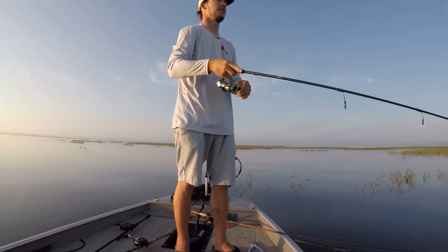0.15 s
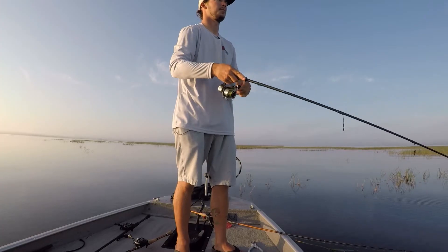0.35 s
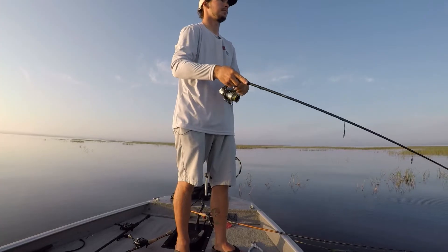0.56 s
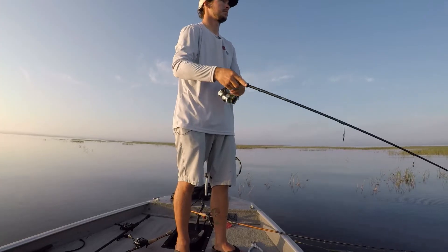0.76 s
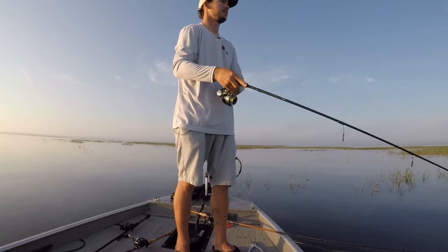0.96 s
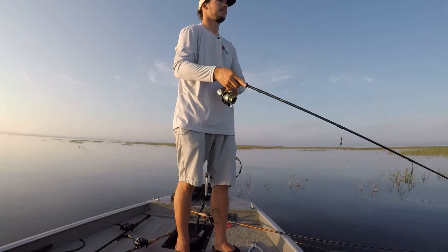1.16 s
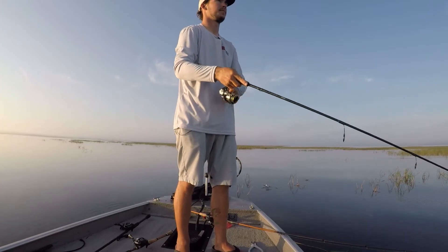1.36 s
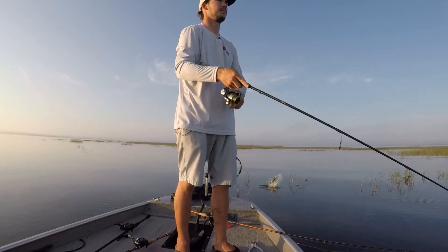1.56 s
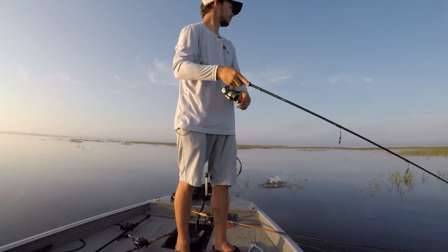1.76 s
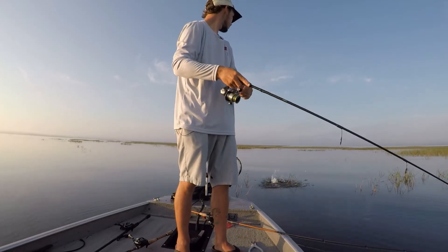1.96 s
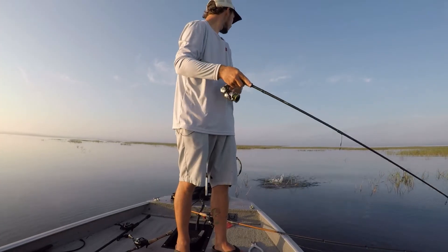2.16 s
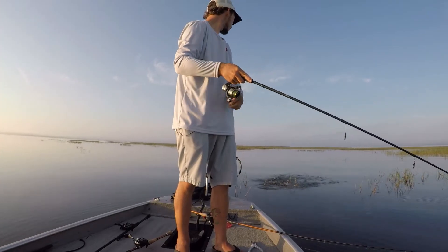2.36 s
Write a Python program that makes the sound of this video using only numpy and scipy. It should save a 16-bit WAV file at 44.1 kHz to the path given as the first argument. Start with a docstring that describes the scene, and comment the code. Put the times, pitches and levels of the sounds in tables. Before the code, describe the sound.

Splashes and bubbly plops on a calm lake, following ticking reel and rustling line above faint motor hum

```python
"""A low, steady hum comes first: the electric trolling motor of a small boat on a calm lake, two harmonics
wavering slightly, under light air that rumbles on the microphone as shaped noise.
An angler's reel and line tick and rustle: short rings of damped modes over crackling noise.
The lure lands and the water gulps, plops and patters: bubbles are damped tones of rising pitch,
and the spray that falls back is tiny pings, slaps and noise."""
import sys
import numpy as np
from scipy import signal
from scipy.fft import rfft, irfft, next_fast_len
from scipy.io import wavfile
from scipy.ndimage import map_coordinates

SR = 44100
rng = np.random.default_rng(int(sys.argv[2]) if len(sys.argv) > 2 else 0)


def master(y):
    """Save y as 16-bit WAV."""
    cut = np.clip(np.atleast_2d(y).T, -1, 1)
    pcm = np.round(cut * 32767)  # scale
    wavfile.write(sys.argv[1], SR, pcm.astype(np.int16))


N = 110250  # samples, 2.5 s

# Spectra are relative: each coloured sound is brought to rms 1 before its level is applied.

# Motor: the drift is a share of the pitch; the octave is second harmonic against first
HUM_HZ, HUM_DB, HUM_DRIFT, HUM_FLUTTER_DB = 135.7, -62.5, 0.0014, 0.5
HUM_OCTAVE_DB = -17.5

# Course of the air's rumble, before its offset and sway: time_s, level_db
AIR_COURSE = [(0, -59), (.15, -49), (.35, -50.5), (.5, -45.5), (.75, -52), (.85, -45.5), (1.15, -48.5),
              (1.44, -49.5), (1.52, -41), (1.65, -50), (1.8, -45), (1.97, -56), (2.22, -50), (2.5, -55)]
# Spectrum of the air's rumble: frequency_hz, density_db
AIR_SPECTRUM = [(8, -2.5), (22, 1.5), (32, -6), (50, -11), (80, -22.5), (125, -23.5), (200, -29.5),
                (300, -37.5), (600, -45), (2000, -94), (5000, -140)]
AIR_OFFSET_DB, AIR_SWAY_DB = 2.5, 1.12
# Spectrum of the lake's steady hush: frequency_hz, density_db
LAKE_SPECTRUM = [(60, -1.5), (200, -2), (320, -5), (600, -3.5), (1100, -7), (2300, -17.5), (4500, -16.5),
                 (7800, -22), (10500, -27.5), (15500, -49)]
LAKE_DB = -67.5

# Envelope of the electrical buzz's harmonics: frequency_hz, gain_db
BUZZ_SPECTRUM = [(2000, -54), (7000, 4), (10000, 8), (15500, 7)]
BUZZ_HZ, BUZZ_DB, BUZZ_ACCENT = 122.595, -83, .6  # accent: extra share on every eighth harmonic
TOP_HZ = 15900  # upper band limit of the whole scene

# Course of the running line's rustle, before its sway: time_s, level_db
LINE_COURSE = [(0, -71.5), (.1, -66.5), (.6, -65.5), (1.0, -64.5), (1.45, -64), (1.7, -65), (2.0, -67.5),
               (2.5, -67)]
# Spectrum of the rustle: frequency_hz, density_db
RUSTLE_SPECTRUM = [(500, -39), (1300, -5.5), (1750, -1), (2300, -1.5), (3100, -4.5), (3600, -5.5),
                   (4100, -9), (5000, -10), (6200, -16.5), (7700, -12), (10000, -18), (15000, -23.5)]
RUSTLE_SWAY_DB = 1
# The reel's main resonance, kept ringing by the line: half-width, level against the rustle, sway
WHIRR_HZ, WHIRR_WIDTH_HZ, WHIRR_DB, WHIRR_SWAY_DB = 2260, 200, -8.5, 1.5
# Ticks of the reel: start_s, level_db (before TICK_DB), brightness_db (at 7 kHz against 2.3 kHz),
# lean_db (where the contact falls, favouring one set of modes or the other)
TICKS = [(0.0366, -53.5, -1, 5), (0.068, -43.5, 3.5, 0), (0.0852, -43, 0, 5.5), (0.105, -47, 1, 4),
         (0.1082, -48, -18, 9), (0.1555, -46.5, 2, 4), (0.1692, -43.5, -12, -2), (0.255, -51, -2, 0),
         (.262, -46, -6, -12), (.337, -34.5, -7, -6.5), (0.353, -40, -7, -3), (.4695, -53, 3, -4),
         (0.4963, -42.5, -3, 1), (0.5213, -36, 2, -7), (0.528, -53, -24, 11), (0.54, -38.5, -0.5, 7),
         (0.553, -48, -10, -5), (0.555, -57, 9, -5), (0.571, -41.5, -8, -17), (.586, -40.5, 0.5, 5),
         (0.595, -48, 3.5, -1), (0.6123, -50, -15, 7), (.626, -55, -22, 6), (.7635, -53, 4.5, -2),
         (0.7894, -37.5, -6.5, -10), (0.8284, -51, 5, -3), (0.9301, -41, -2.5, -3.5), (0.9369, -41, 2, -1),
         (0.9754, -41, -1.5, 5), (1.0095, -40, -4.5, -17), (1.028, -46, -3, -9), (1.0345, -42.5, 4, 2.5),
         (1.1965, -46.5, 1.5, 10), (1.2294, -41.5, -5.5, -13), (1.2395, -56, 5, -3), (1.353, -49, -9, 5),
         (1.3773, -40.5, 1, 1), (1.4113, -44.5, -2.5, 7), (1.4491, -39.5, -15, -6), (1.4583, -36, -14, -2),
         (1.4597, -37, -20, -2), (1.4801, -41, 0, 5), (1.6798, -41.5, -5, -11)]
# Modes of the reel, before scatter: frequency_hz, level_db, t60_s, lean_share (no unit)
REEL_MODES = [(1744, -6, 0.012, 0.77), (2305, -0.5, 0.0085, -0.14), (2820, 0.5, 0.0054, 0.039),
              (4030, -3, 0.0063, 1), (5180, -6, 0.0064, -0.12), (5950, -6.5, 0.0052, -0.48),
              (7420, -3, 0.0043, 0.35), (8400, -2.5, 0.0022, 0.35), (11000, -13, .004, -0.39),
              (13000, -15, 0.006, 0.091)]
TICK_DB, TICK_RISE_S = -3, 0.000069
MODE_SCATTER_DB, MODE_SCATTER, MODE_LAG_S = 1.8, .025, .0006  # level, share of pitch, longest delay
REEL_LOW_HZ = 1360  # the small reel radiates no bass

# Soft bumps of the hull: centre_s, level_db, length_s
BUMPS = [(.01, -58, 0.078), (0.434, -53, 0.015), (.56, -73, .018), (0.658, -59, 0.029), (1.108, -60, 0.024),
         (1.307, -58.5, 0.023), (1.444, -51.5, 0.023), (1.766, -50, 0.06), (1.908, -53, 0.023),
         (2.003, -51.5, 0.014)]
# Spectrum of the bumps: frequency_hz, density_db
HULL_SPECTRUM = [(20, -30), (45, 1.5), (85, 1), (160, -15), (280, -16), (450, -23.5), (1200, -23),
                 (4000, -120)]
# Small waves lapping at the hull: centre_s, level_db, pitch_hz, length_s
LAPS = [(0.013, -64.5, 295, 0.034), (0.442, -73, 282, .02), (0.665, -66.5, 290, 0.033),
        (.78, -67.5, 240, 0.036), (.905, -64, 240, 0.03), (1.094, -61, 290, 0.013),
        (1.767, -62, 270, 0.046), (1.95, -61.5, 214, 0.021)]
LAP_WIDTH_OCT = 0.47

# Modes of the rod's handle: frequency_hz, level_db (against KNOCK_DB), t60_s
HANDLE_MODES = [(550, -8, 0.043), (900, -10.5, 0.018), (1170, 0, 0.014), (1760, 2, 0.016)]
KNOCK_S, KNOCK_DB = .3372, -51  # the hardest early click also knocks the handle

# Splashes: start_s, hold_s, release_t60_s, bubble_level_db, bubble_centre_pitch_hz, spray_level_db
SPLASHES = [(1.411, 0.07, 0.098, -57.5, 376, -63.5), (1.479, 0.016, 0.25, -56.5, 620, -81),
            (1.544, 0.079, 0.58, -63.5, 1034, -68), (1.711, 0.042, 0.59, -60.5, 993, -61.5),
            (1.846, 0.019, 0.3, -53, 1140, -61), (1.877, 0.032, 0.16, -53, 694, -60),
            (1.939, 0.097, 0.15, -64.5, 835, -62.5), (2.06, 0.094, 0.21, -60, 830, -65),
            (2.15, 0.11, 0.24, -71.5, 1010, -66), (2.268, 0.045, 0.42, -67, 1180, -66.5)]
# Single large bubbles: start_s, level_db, starting_pitch_hz, t60_s
PLOPS = [(1.438, -45.5, 287, 0.051), (1.488, -54, 414, 0.038), (1.513, -47.5, 519, 0.055),
         (1.52, -54, 1050, 0.047), (1.7742, -42, 1000, 0.021), (1.8603, -39, 844, 0.024),
         (1.869, -38.5, 630, 0.064), (1.881, -43, 956, 0.018), (1.886, -45, 441, 0.039),
         (1.898, -42, 558, 0.038), (1.948, -42.5, 523, 0.019), (1.989, -45, 655, 0.033),
         (2.0655, -36, 638, 0.025), (2.074, -47, 812, 0.042), (2.107, -46.5, 936, .04),
         (2.269, -47.5, 900, 0.05)]
SPLASH_RISE_S, PLOP_RISE_S = 0.006, 0.001
PLOP_GLIDE_PER_S = 3.9  # share of the starting pitch gained each second
BUBBLES_PER_S, CLOUD_S = 400, .3
BUBBLE_SPREAD, BUBBLE_CYCLES = 0.333, 24  # scatter of log pitch; periods in one t60
# Spectrum of the spray: frequency_hz, density_db
SPRAY_SPECTRUM = [(400, -18), (1200, 5.5), (2700, 1), (4200, 0.5), (5100, -7.5), (6200, 2), (7200, -9.5),
                  (8600, -1.5), (10500, -8), (12500, -7.5), (15500, -20)]
DROP_LOW_HZ, DROP_HIGH_HZ = 1200, 14000
DROP_T60_S, DROP_SPREAD_DB, MIST = .005, 20, .6  # t60 before scatter; mist against the drops

# Spectrum of the thin sheet of spray that opens the main splash: frequency_hz, density_db
SPURT_SPECTRUM = [(1000, -18), (3600, 5), (5500, -20), (7500, 12), (9000, 5), (10500, -1), (15500, -24)]
SPURT_S, SPURT_LENGTH_S, SPURT_DB = 1.738, 0.028, -66

# Single drops of spray hitting the water: start_s, level_db, starting_pitch_hz
DROPS = [(1.7257, -44, 7700), (1.727, -53, 2400), (1.7515, -45.5, 3230), (1.8096, -43, 3300),
         (1.853, -47, 3120), (1.8585, -51, 4370), (1.8635, -45, 1540), (1.8665, -47, 3670),
         (1.867, -42, 1700), (1.881, -40, 1510), (1.889, -51, 4500), (1.902, -58, 11600),
         (1.908, -45, 1800), (1.9615, -50, 12500), (1.9695, -52, 6260), (1.983, -53, 8800),
         (2.011, -53, 9150), (2.047, -48, 2980), (2.0725, -52, 3330), (2.1038, -45.5, 6200),
         (2.149, -47, 8850), (2.167, -53, 2590), (2.205, -45, 8400), (2.2378, -42.5, 2700),
         (2.241, -50, 9050), (2.271, -41, 2820), (2.294, -45, 5950), (2.318, -47, 3500)]
# t60 of the ping; level against it and t60 of the slap that opens it
DROP_RING_S, DROP_SLAP_DB, DROP_SLAP_S = .007, -5.5, 0.0023

# Course of the finest drops: time_s, level_db
SIZZLE_COURSE = [(1.8, -100), (1.9, -72), (2.1, -73.5), (2.32, -70.5), (2.4, -76.5)]
# Spectrum of the finest drops: frequency_hz, density_db
SIZZLE_SPECTRUM = [(2000, -44), (5400, -30), (6150, -8), (7000, -10), (15000, -40)]

DECK_DB, DECK_T60_S = -13.5, 0.041  # scatter from the boat's deck and hull


def amp(db):
    """Decibel law: level to amplitude gain."""
    return 10 ** (np.asarray(db) / 20)


def unit(x):
    """Normalisation: x at rms 1."""
    return x / np.sqrt(np.mean(x ** 2) + 1e-20)


def curve(rows):
    """Linear interpolation: one value per sample from (s, value) rows."""
    return np.interp(np.arange(N) / SR, *np.transpose(rows))


def wobble(rate):
    """Spline interpolation: a smooth random curve with rate knots a second."""
    return map_coordinates(rng.standard_normal(1024), [np.arange(N) * rate / SR], mode="wrap")


def filtered(x, response):
    """Linear filtering: the spectrum of x times a response of frequency."""
    m = next_fast_len(N + SR // 2)
    return irfft(rfft(x, m) * response(np.fft.rfftfreq(m, 1 / SR)), m)[:N]


def coloured(x, points):
    """Spectral shaping: x filtered through (Hz, dB) points on a log frequency axis, at rms 1."""
    f, db = np.transpose(points)
    return unit(filtered(x, lambda hz: amp(np.interp(np.log(hz + 1), np.log(f + 1), db))))


def add(track, s, sound):
    """Superposition: mixes a sound into a track at time s."""
    i = int(np.clip(round(s * SR), 0, N))
    track[i:i + len(sound)] += sound[:N - i]


def crackle(per_s, spread_db, smooth):
    """Random impulse process: tiny impacts of uneven size over a share of smooth noise."""
    sizes = rng.standard_normal(N) * amp(spread_db * rng.standard_normal(N))
    hits = (rng.random(N) < per_s / SR) * sizes
    return unit(hits) + smooth * rng.standard_normal(N)


def motor():
    """Harmonic tone: a nearly pure hum, its pitch and level wavering slightly with the propeller's load."""
    phase = 2 * np.pi * np.cumsum(HUM_HZ * (1 + HUM_DRIFT * wobble(5.77))) / SR
    tone = np.sin(phase) + amp(HUM_OCTAVE_DB) * np.sin(2 * phase)
    return amp(HUM_DB + HUM_FLUTTER_DB * wobble(8.3)) * unit(tone)


def air():
    """Broadband noise: a swaying low rumble of light wind on the microphone over the lake's hush."""
    level_db = curve(AIR_COURSE) + AIR_OFFSET_DB + AIR_SWAY_DB * wobble(12)
    rumble = amp(level_db) * coloured(rng.standard_normal(N), AIR_SPECTRUM)
    return rumble + amp(LAKE_DB) * coloured(rng.standard_normal(N), LAKE_SPECTRUM)


def buzz():
    """Fourier series: in-phase harmonics add up to faint, thin electrical pulses."""
    t, pulses = np.arange(N) / SR, np.zeros(N)
    for k in range(1, int(TOP_HZ / BUZZ_HZ) + 1):
        accent = 1 + BUZZ_ACCENT * (k % 8 == 0)
        pulses += accent * np.cos(2 * np.pi * k * BUZZ_HZ * t)
    return amp(BUZZ_DB) * coloured(pulses, BUZZ_SPECTRUM)


def tick(bright_db, lean_db):
    """Modal decay: one contact excites the reel's modes, each arriving a little late and dying away."""
    hz, db, t60, share = np.transpose(REEL_MODES)[:, :, None]
    size, detune, phase = rng.standard_normal((3, len(REEL_MODES), 1))
    lag = MODE_LAG_S * rng.random((len(REEL_MODES), 1))
    t = np.maximum(np.arange(SR // 40) / SR - lag, 0)
    tilt = np.log(hz / 2300) / np.log(7000 / 2300)  # 0 at 2.3 kHz, 1 at 7 kHz
    gain = amp(db + MODE_SCATTER_DB * size + bright_db * tilt + lean_db * share - 60 * t / t60)
    tones = np.sin(2 * np.pi * (hz * (1 + MODE_SCATTER * detune) * t + phase))
    ring = (gain * tones * (1 - np.exp(-t / TICK_RISE_S))).sum(0)
    return signal.sosfilt(signal.butter(2, REEL_LOW_HZ, "high", fs=SR, output="sos"), ring)


def reel():
    """Friction and resonance: rustle of running line, a wavering whirr, and ticks over both."""
    grain = crackle(2500, spread_db=4, smooth=.7)
    noise = rng.standard_normal(N)
    whirr = unit(filtered(noise, lambda hz: 1 / (1 + ((hz - WHIRR_HZ) / WHIRR_WIDTH_HZ) ** 2)))
    running = coloured(grain, RUSTLE_SPECTRUM) + amp(WHIRR_DB + WHIRR_SWAY_DB * wobble(15)) * whirr
    out = amp(curve(LINE_COURSE) + RUSTLE_SWAY_DB * wobble(17.92)) * running
    for s, db, bright_db, lean_db in TICKS:
        add(out, s, amp(db + TICK_DB) * tick(bright_db, lean_db))
    return out


def hull():
    """Low-frequency noise bursts: dull bumps as the boat shifts in the water."""
    t = np.arange(N) / SR
    swell = sum(amp(db) * np.exp(-((t - s) / length) ** 2) for s, db, length in BUMPS)
    return swell * coloured(rng.standard_normal(N), HULL_SPECTRUM)


def laps():
    """Narrow-band noise: small waves swell and gurgle softly against the hull."""
    t, out = np.arange(N) / SR, np.zeros(N)
    for s, db, hz, length in LAPS:
        noise = rng.standard_normal(N)
        gurgle = filtered(noise, lambda f: np.exp(-(np.log2((f + 1) / hz) / LAP_WIDTH_OCT) ** 2))
        out += amp(db) * np.exp(-((t - s) / length) ** 2) * unit(gurgle)
    return out


def handle():
    """Modal decay: a dull knock rings the few low modes of the rod's handle."""
    t, out = np.arange(SR // 20) / SR, np.zeros(N)
    for hz, db, t60 in HANDLE_MODES:
        add(out, KNOCK_S, amp(KNOCK_DB + db - 60 * t / t60) * np.sin(2 * np.pi * hz * t))
    return out


def bubble(hz, t60, rise_s):
    """Bubble resonance: a damped tone whose pitch climbs as the bubble nears the surface."""
    t = np.arange(SR // 10) / SR
    tone = np.sin(2 * np.pi * hz * t * (1 + PLOP_GLIDE_PER_S * t / 2))
    return tone * amp(-60 * t / t60) * (1 - np.exp(-t / rise_s))


def cloud(s, hz):
    """Random superposition: small bubbles scattered around one pitch from time s, at rms 1 over CLOUD_S."""
    out, count = np.zeros(N), int(BUBBLES_PER_S * CLOUD_S)
    for k, (late, pitch, size) in enumerate(rng.standard_normal((count, 3))):
        f = hz * np.exp(BUBBLE_SPREAD * np.clip(pitch, -2, 2))
        start = s + (k + late / 2) / BUBBLES_PER_S
        add(out, start, np.tanh(size) * bubble(f, BUBBLE_CYCLES / f, 1 / f))
    return out / np.sqrt(np.sum(out ** 2) / (CLOUD_S * SR))


def droplets(count):
    """Random superposition: a steady patter of tiny ringing drops over a fine mist, at rms 1."""
    t, out = np.arange(SR // 60) / SR, np.zeros(N)
    for when, pitch, size, life in rng.random((count, 4)):
        hz = DROP_LOW_HZ * (DROP_HIGH_HZ / DROP_LOW_HZ) ** np.sqrt(pitch)  # favours high pitches
        ping = np.sin(2 * np.pi * hz * t) * (1 - np.exp(-t / TICK_RISE_S))
        t60 = DROP_T60_S * (.5 + life)
        add(out, when * N / SR, ping * amp(-DROP_SPREAD_DB * size - 60 * t / t60))
    return coloured(unit(out) + MIST * rng.standard_normal(N), SPRAY_SPECTRUM)


def water():
    """Bubble acoustics: each splash is a bubble cloud under pattering spray; large bubbles plop singly."""
    t, out, spray_power = np.arange(N) / SR, np.zeros(N), np.zeros(N)
    drops = droplets(count=3600)
    for s, hold, t60, db, hz, spray_db in SPLASHES:
        release = amp(-60 * np.maximum(t - s - hold, 0) / t60)
        shape = np.clip((t - s) / SPLASH_RISE_S, 0, 1) * release
        out += amp(db) * shape * cloud(s, hz)
        spray_power += (amp(spray_db) * shape) ** 2
    for s, db, hz, t60 in PLOPS:
        add(out, s, amp(db) * bubble(hz, t60, PLOP_RISE_S))
    return out + np.sqrt(spray_power) * drops


def spurt():
    """Noise burst: a short bright hiss as the surface breaks."""
    swell = np.exp(-((np.arange(N) / SR - SPURT_S) / SPURT_LENGTH_S) ** 2)
    return amp(SPURT_DB) * swell * coloured(rng.standard_normal(N), SPURT_SPECTRUM)


def spatter():
    """Impact and resonance: larger drops land one by one, each a noise slap with a short bubble ping."""
    t, out = np.arange(SR // 10) / SR, np.zeros(N)
    splat = coloured(rng.standard_normal(N), SPRAY_SPECTRUM)
    for s, db, hz in DROPS:
        piece = np.roll(splat, rng.integers(N))[:len(t)]
        slap = piece * amp(DROP_SLAP_DB - 60 * t / DROP_SLAP_S)
        add(out, s, amp(db) * (slap + bubble(hz, DROP_RING_S, 1 / hz)))
    return out


def sizzle():
    """Random impulse process: the finest drops rain back on the surface in a narrow, high band."""
    grain = crackle(700, spread_db=2, smooth=.35)
    return amp(curve(SIZZLE_COURSE)) * coloured(grain, SIZZLE_SPECTRUM)


def deck(x):
    """Diffuse scattering: x convolved with a brief decaying noise tail, as from the deck and hull."""
    t = np.arange(SR // 8) / SR
    tail = rng.standard_normal(len(t)) * amp(-60 * t / DECK_T60_S) * (t > .002)
    return signal.fftconvolve(x, tail / np.linalg.norm(tail))[:N]


def scene():
    """Superposition: hum, air, buzz and hull under the tackle and splashes, which alone scatter."""
    bed = motor() + air() + buzz() + hull() + laps()
    sharp = reel() + handle() + water() + spurt() + spatter() + sizzle()
    return (bed + sharp + amp(DECK_DB) * deck(sharp))[None]


def record(dry):
    """Band limitation: only frequencies below TOP_HZ pass."""
    return filtered(dry[0], lambda hz: hz < TOP_HZ)[None]


dry = scene()
out = record(dry)
master(out)
```